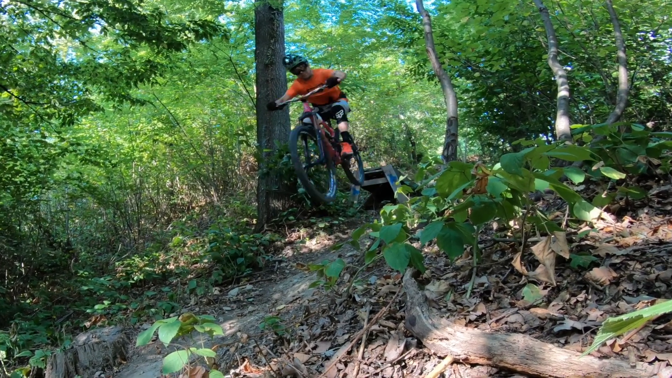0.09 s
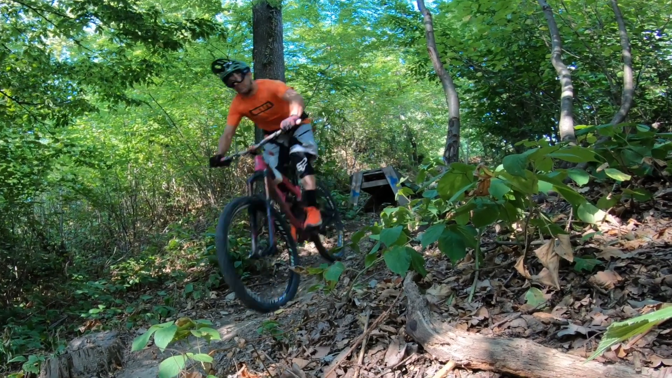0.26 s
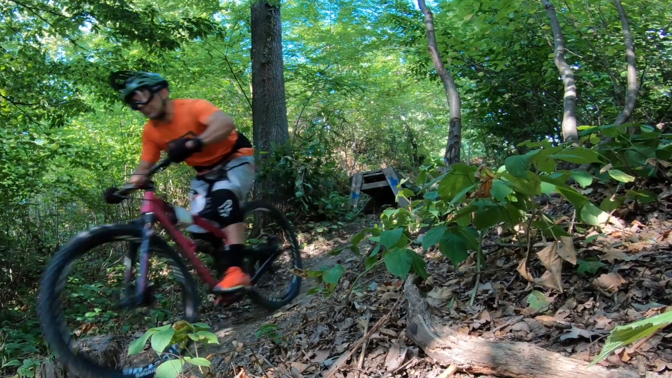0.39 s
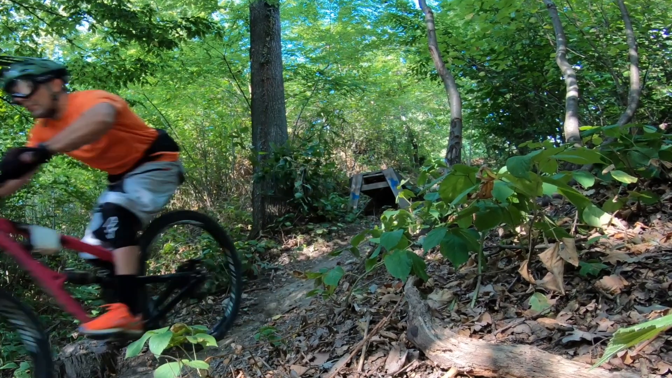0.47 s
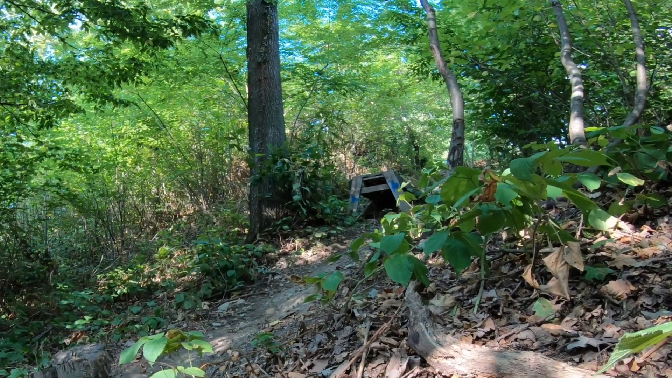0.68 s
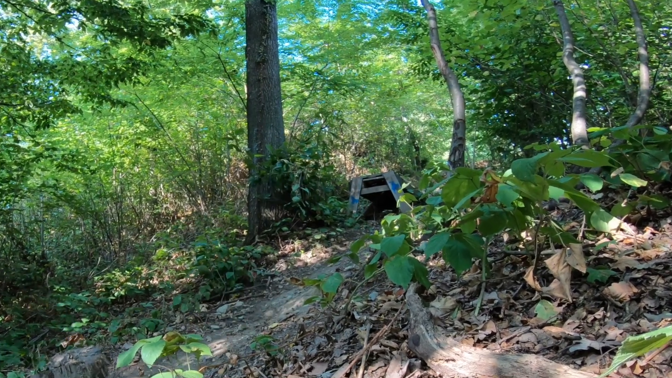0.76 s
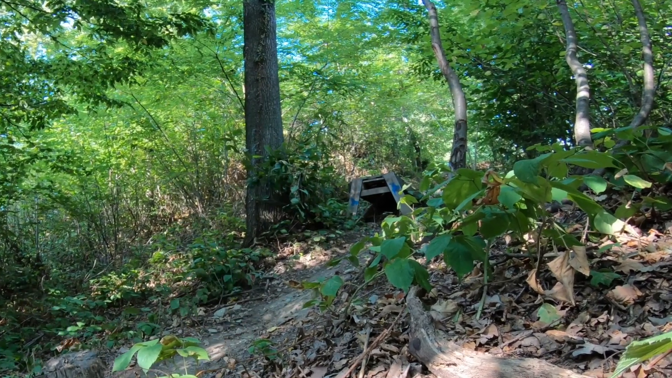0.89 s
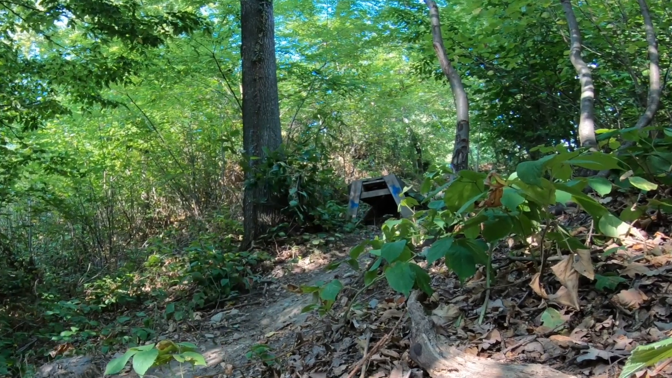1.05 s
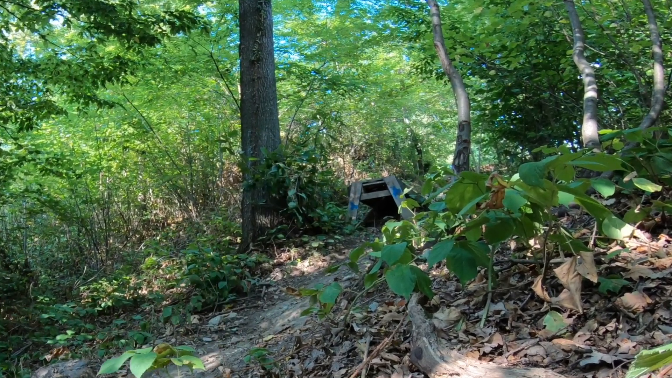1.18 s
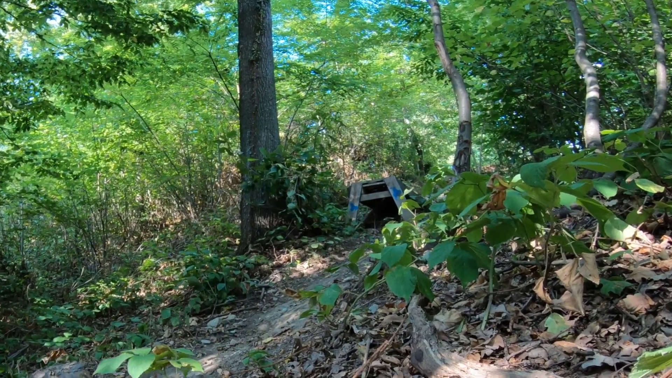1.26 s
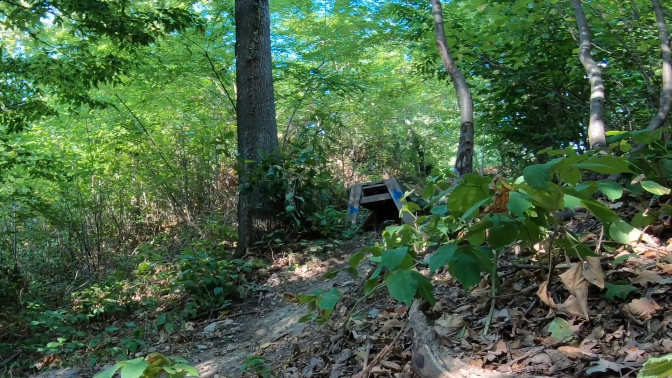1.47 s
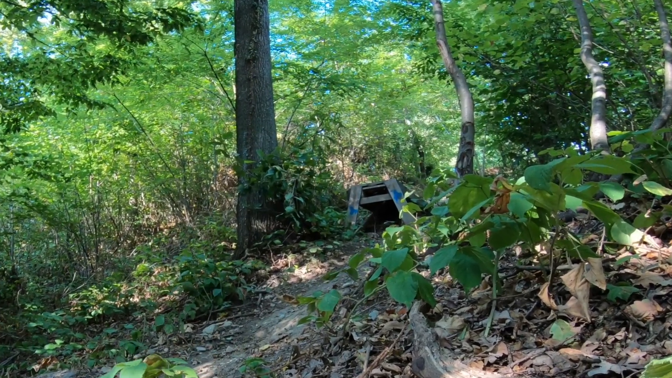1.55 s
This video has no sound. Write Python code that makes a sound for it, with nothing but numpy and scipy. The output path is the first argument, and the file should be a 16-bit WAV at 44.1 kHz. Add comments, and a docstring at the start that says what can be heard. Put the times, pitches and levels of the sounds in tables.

```python
"""A mountain bike lands on a leafy dirt trail close by and rolls away to the left in a faintly hissing wood.
Wheel thumps, knocks and chain clinks are decaying sine waves, the knocks and clinks with a contact sound.
Tyres ring as filtered noise and drone as gliding tones; discs and spokes sing as unsteady gliding tones.
Rattle, crunch, twigs and leaves are swarms of tiny random clicks, filtered; rumble and hiss are noise."""
import sys
import numpy as np
from scipy import signal
from scipy.fft import rfft, irfft
from scipy.io import wavfile
from scipy.ndimage import uniform_filter1d, map_coordinates

SR = 44100
rng = np.random.default_rng(int(sys.argv[2]) if len(sys.argv) > 2 else 0)


def bounce(signal):
    """Save signal as a 16-bit WAV file at the path given by the first command-line argument."""
    frames = np.transpose(np.atleast_2d(signal))
    limited = np.clip(frames, -1, 1)
    pcm = np.round(limited * 32767).astype(np.int16)
    wavfile.write(sys.argv[1], SR, pcm)


N = 72765  # length in samples

# Where the bike is between left and right: t/s, left minus right/dB
BIKE_PAN = [(0, -2), (.25, -2), (.45, 0), (.56, .5), (.65, 4.5), (.76, 7.5), (1.0, 7), (1.3, 8.5),
            (1.65, 8)]
# Clicks in leaves, grit and twigs: how many per second, and how unequal their strengths are in dB
LITTER_PER_S, LITTER_SPREAD_DB = 4500, 2.7


def undb(db):
    """Turn decibels into an amplitude factor."""
    return 10 ** (np.asarray(db) / 20)


def unit(x):
    """Scale to rms 1."""
    return x / np.sqrt(np.mean(x ** 2))


def times():
    """The time of every sample in seconds."""
    return np.arange(N) / SR


def curve(rows, axis=1):
    """One column of a table, joined by straight lines in time."""
    rows = np.array(rows)
    return np.interp(times(), rows[:, 0], rows[:, axis])


def colour(x, points):
    """Filter through (f/Hz, level/dB) points without pre-echo, keeping the power of white noise."""
    size = 8192
    hz, db = np.array(points).T
    bins_hz = np.maximum(np.fft.rfftfreq(size, 1 / SR), 1)
    gain = undb(np.interp(np.log(bins_hz), np.log(hz), db))
    # folding the cepstrum makes the filter respond as early as it can (minimum phase)
    cepstrum = irfft(np.log(gain))
    cepstrum[1:size // 2] *= 2
    cepstrum[size // 2 + 1:] = 0
    response = irfft(np.exp(rfft(cepstrum)))
    return signal.fftconvolve(x, response / np.linalg.norm(response))[:len(x)]


def below(x, hz):
    """The part of a sound under a frequency, with no delay."""
    low_pass = signal.butter(3, min(hz, SR / 3), fs=SR, output="sos")
    return signal.sosfiltfilt(low_pass, x)


def resonance(x, hz, width):
    """A resonance applied twice, for steep skirts; rms 1. The width in Hz is that of one pass."""
    b, a = signal.iirpeak(hz, hz / width, fs=SR)
    once = signal.lfilter(b, a, x)
    return unit(signal.lfilter(b, a, once))


def grains(per_s, spread_db):
    """Random tiny impacts, a few far stronger than the rest; rms 1."""
    size = undb(spread_db * np.minimum(rng.exponential(size=N), 5))
    hits = rng.random(N) < per_s / SR
    return unit(hits * size * rng.choice([-1, 1], N))


def burst(x, env):
    """Shape a sound by an envelope, keeping the envelope's energy."""
    shaped = x * env
    return shaped * np.linalg.norm(env) / (np.linalg.norm(shaped) + 1e-12)


def fade(age, t60):
    """Exponential decay that falls by 60 dB in t60 seconds."""
    return np.exp(-np.log(1000) * age / t60)


def ring(start, hz, t60):
    """One struck mode: a sine wave that dies away."""
    age = np.maximum(times() - start, 0)
    return np.sin(2 * np.pi * hz * age) * fade(age, t60)


def peak(x, db):
    """Scale a sound so that its highest peak has this level."""
    return x * undb(db) / (np.abs(x).max() + 1e-12)


def bell(middle, half):
    """A smooth rise and fall around a moment."""
    return np.exp(-.5 * ((times() - middle) / half) ** 2)


def walk(per_s):
    """Slow chance: random points, so many per second, joined by lines; spread near 1."""
    return np.interp(times() * per_s, np.arange(1000), rng.standard_normal(1000))


def waver(x, share, per_s):
    """Let the pitch of a sound wander by a share of itself."""
    drift = walk(per_s)
    read_at = np.cumsum(1 + share * (drift - drift.mean()))
    return map_coordinates(x, [read_at], mode="mirror")


def wood():
    """Faint air and the high hiss of insects and foliage: filtered noise, separate left and right."""
    # Tone of the air: f/Hz, level/dB
    air_tone = [(20, -16), (40, -2), (80, -9), (150, 0), (230, 0), (340, -19), (700, -19), (1500, -11),
                (2300, -3), (4800, -9), (6800, -1), (9000, -7), (13000, -21), (15000, -31)]
    # Loudness of the distant hiss: t/s, level/dB
    hiss_level = [(0, -64), (.6, -56), (1.1, -52), (1.45, -53), (1.57, -48.5), (1.65, -50)]
    # Tone of the hiss: f/Hz, level/dB
    hiss_tone = [(1000, -35), (3000, -8), (5000, -5), (7200, 0), (10000, -5), (11500, -17), (15000, -32)]
    air = np.array([colour(rng.standard_normal(N), air_tone) for _ in range(2)])
    hiss = np.array([colour(rng.standard_normal(N), hiss_tone) for _ in range(2)])
    return undb(-54.5) * air + undb(curve(hiss_level)) * hiss


def leaves():
    """Dry leaves and grit are thrown up and settle, other bits to the left than to the right."""
    # Sprays of dry leaves and grit: t/s, level/dB, decay/s
    spray_table = [(.222, -35, .05), (.256, -27, .018), (.287, -24, .012), (.41, -34, .012),
                   (.452, -30.5, .025), (.472, -29, .01), (.496, -25.5, .007), (.62, -37, .025),
                   (.749, -35, .035), (.846, -37, .045), (.959, -31.5, .06)]
    # Fine grit under the tread: t/s, level/dB
    grit_level = [(0, -64), (.15, -57), (.21, -59), (.23, -41), (.33, -36.5), (.39, -40), (.48, -39),
                  (.53, -45), (.58, -44), (.70, -50), (.8, -48), (1.05, -48), (1.2, -53), (1.32, -49),
                  (1.45, -53), (1.65, -52)]
    # Tone of leaves and grit: f/Hz, level/dB
    litter_tone = [(400, -30), (2000, -7), (3500, -2), (5000, 0), (7200, 0), (8300, -5), (9800, -8),
                   (11500, -19), (13500, -24), (15000, -40)]
    attack_s = .002
    t = times()
    power = undb(curve(grit_level)) ** 2
    for start, db, decay in spray_table:
        attack = np.clip((t - start) / attack_s, 0, 1)
        power += (undb(db) * attack * np.exp(-np.abs(t - start) / decay)) ** 2
    env = np.sqrt(power)
    pan = -2 + curve(BIKE_PAN) / 2  # left minus right in dB: follows the bike by half
    ears = []
    for side in (1, -1):
        litter = colour(grains(LITTER_PER_S, LITTER_SPREAD_DB) * env, litter_tone)
        ears.append(litter * undb(side * pan / 2))
    return np.array(ears)


def twigs():
    """Twigs and dry stalks crack under the tyres: a few clicks of breaking fibre that die at once."""
    # Snaps: t/s, peak/dB, top of the crack f/Hz
    snap_table = [(.2615, -18, 7000), (.2875, -19, 8000), (.2945, -17, 7000), (.452, -17, 5000),
                  (.459, -16, 6000), (.4732, -15, 6500), (.6205, -18, 6000), (.7492, -17.5, 14000),
                  (.8448, -15, 14000), (.958, -14, 14000), (1.0815, -27, 9000), (1.162, -30, 6000),
                  (1.322, -27, 5000), (1.3735, -29, 5000)]
    # Tone of a snap: f/Hz, level/dB
    snap_tone = [(300, -35), (1800, -12), (2600, 0), (3700, -1), (5200, -7), (9500, -7), (12000, -21),
                 (15000, -42)]
    decay_s = .002
    t, fibres = times(), grains(LITTER_PER_S, LITTER_SPREAD_DB)
    out = np.zeros(N)
    for start, db, top_hz in snap_table:
        cracking = fibres * (t > start) * np.exp(-np.abs(t - start) / decay_s)
        out += peak(below(colour(cracking, snap_tone), top_hz), db)
    return out


def zings():
    """Brake discs and spokes are rubbed into a short, unsteady ring, often sagging in pitch."""
    # Zings: middle t/s, half length/s, f/Hz at the middle, glide/(Hz per s), level/dB
    zing_table = [(.368, .018, 1980, -7000, -35), (.43, .018, 2900, -3000, -41),
                  (.603, .016, 2570, -7000, -35), (.645, .022, 2120, -4000, -38), (.99, .02, 1990, 0, -37),
                  (1.485, .02, 2900, -3000, -48), (1.56, .025, 2650, 0, -45),
                  (1.615, .018, 2720, -3000, -44)]
    rub_per_s = 180  # faster rubbing blurs the pitch more
    t = times()
    rub = walk(rub_per_s) + 1j * walk(rub_per_s)
    out = np.zeros(N)
    for middle, half, hz, glide, db in zing_table:
        phase = 2 * np.pi * np.cumsum(hz + glide * (t - middle)) / SR
        tone = np.real(rub * np.exp(1j * phase))
        out += undb(db) * burst(tone, bell(middle, half))
    return out


def clinks():
    """Chain links scrape into contact with metal and give a short, dry ring."""
    # Clinks: t/s, peak/dB, f/Hz, time to fall 60 dB/s
    clink_table = [(.2260, -13, 2950, .007), (.4105, -10, 2930, .011), (.4995, -14, 2780, .013),
                   (1.4612, -24, 2900, .012), (1.5138, -27.5, 2680, .025), (1.552, -30, 2650, .015),
                   (1.6025, -29, 2750, .014), (1.624, -29, 2620, .014)]
    # Modes of the metal: pitch ratio to the clink, level/dB
    metal_modes = [(.55, -13), (.8, -14), (.94, -7), (1, 0), (1.09, -10), (2.05, -16)]
    contact_s, scrape_db = .0015, -9
    out, t = np.zeros(N), times()
    chances = rng.standard_normal((len(clink_table), len(metal_modes)))
    for (start, db, hz, t60), chance in zip(clink_table, chances):
        metal = np.zeros(N)
        for (ratio, mode_db), c in zip(metal_modes, chance):
            metal += undb(mode_db) * ring(start, hz * ratio * (1 + .015 * c), t60)
        scrape = resonance(rng.standard_normal(N), hz, hz / 2) * fade(np.abs(t - start), t60)
        contact = np.clip((t - start) / contact_s, 0, 1)
        out += peak((metal + undb(scrape_db) * scrape) * contact, db)
    return out


def knocks():
    """A sharp one-cycle contact, then the frame rings, most in the modes near the contact's pitch."""
    # Stones and chain hitting the frame: t/s, contact peak/dB, contact f/Hz, frame ring peak/dB
    knock_table = [(.2133, -22, 1900, -28), (.4648, -10, 1500, -22), (.5545, -15, 1100, -11),
                   (.5567, -11, 1400, -14), (.5625, -16, 2200, -11.5), (.5654, -10, 2800, -22),
                   (.6203, -18, 2300, -27), (.6318, -14, 1700, -23), (.6678, -19, 2100, -28),
                   (.768, -22, 1400, -26), (.789, -25, 1100, -30), (.863, -24, 900, -27),
                   (.878, -25, 1300, -29), (1.0303, -17.5, 1100, -21), (1.1975, -27, 1900, -33),
                   (1.2330, -24, 1100, -35), (1.2958, -21, 800, -29), (1.3053, -16, 1300, -26),
                   (1.3122, -21, 550, -30)]
    # Modes of the frame: f/Hz, level/dB, time to fall 60 dB/s
    frame_modes = [(680, -8, .025), (950, -6, .025), (1200, -7, .025), (1375, 0, .03), (1600, -5, .025),
                   (2140, 0, .03), (3100, -8, .02)]
    out, t = np.zeros(N), times()
    chances = rng.standard_normal((len(knock_table), len(frame_modes)))
    for (start, db, hz, ring_db), chance in zip(knock_table, chances):
        squeeze = (np.pi * hz * (t - start)) ** 2
        contact = (2 * squeeze - 1) * np.exp(-squeeze)
        frame = np.zeros(N)
        for (mode_hz, mode_db, t60), c in zip(frame_modes, chance):
            closeness = (mode_hz / hz) ** 2 * np.exp(-(mode_hz / hz) ** 2)
            frame += undb(mode_db) * closeness * ring(start, mode_hz * (1 + .015 * c), t60)
        out += peak(contact, db) + peak(frame, ring_db)
    return out


def rattles():
    """Each bump shakes a swarm of clicks out of chain and frame."""
    # Bursts of rattle: middle t/s, half length/s, level/dB, treble against body/dB
    rattle_table = [(.155, .028, -50.5, 22), (.220, .005, -26, 6), (.318, .008, -34, 8),
                    (.4545, .003, -27, 10), (.461, .003, -28, 10), (.475, .004, -25.5, 10),
                    (.5585, .009, -14.5, 7), (.627, .0075, -19, 1.5), (.667, .004, -29, 3),
                    (.680, .004, -28, -4), (.714, .005, -33, -3), (.755, .006, -31, -2),
                    (.769, .005, -26, 2), (.791, .005, -30, -4), (.870, .009, -27, -1),
                    (1.085, .005, -35, 2), (1.166, .005, -34, 8), (1.238, .005, -36, -4),
                    (1.315, .008, -33.5, -7), (1.338, .007, -40, -14), (1.362, .013, -32.5, -11),
                    (1.460, .012, -33.5, -7), (1.560, .008, -33.5, -6), (1.612, .007, -32.5, -5)]
    # Tone of the body of the rattle: f/Hz, level/dB
    body_tone = [(80, -22), (170, -3), (300, -1), (480, 0), (680, 1), (900, -1.5), (1350, -2), (2000, -13),
                 (4000, -31), (15000, -76)]
    # Tone of its treble: f/Hz, level/dB
    treble_tone = [(200, -30), (900, -12), (1380, 4), (1780, -3), (2150, 2.5), (2450, -7), (3000, -7),
                   (4100, -17), (7000, -21), (8500, -35), (15000, -70)]
    clicks = grains(per_s=4500, spread_db=1.8)
    body, treble = np.zeros(N), np.zeros(N)
    for middle, half, db, treble_db in rattle_table:
        env = 1 / (1 + ((times() - middle) / half) ** 4)
        # the division keeps body and treble together at the given level
        swarm = undb(db) * burst(clicks, env) / np.hypot(1, undb(treble_db))
        body += swarm
        treble += undb(treble_db) * swarm
    return colour(body, body_tone) + colour(treble, treble_tone)


def drones():
    """A tyre pressed into the ground drones briefly, its pitch wavering and often sliding with the load."""
    # Drones: middle t/s, half length/s, f/Hz at the middle, glide/(Hz per s), level/dB
    drone_table = [(.262, .02, 232, 0, -31.5), (.41, .025, 400, -150, -41), (.485, .02, 97, -200, -34),
                   (.51, .035, 236, -100, -35), (.59, .025, 400, -200, -34), (.605, .035, 129, -120, -34),
                   (.74, .05, 400, 0, -43), (.79, .025, 228, 200, -34), (.97, .035, 110, -350, -41),
                   (1.01, .03, 232, 0, -39), (1.275, .025, 228, -100, -35), (1.375, .02, 172, -300, -42),
                   (1.475, .018, 332, 0, -43)]
    out, t = np.zeros(N), times()
    flex = 1 + .025 * walk(per_s=40)
    for middle, half, hz, glide, db in drone_table:
        phase = 2 * np.pi * np.cumsum((hz + glide * (t - middle)) * flex) / SR
        out += undb(db) * np.sqrt(2) * np.sin(phase) * bell(middle, half)
    return out


def even(x):
    """Smooth out the loudness over about a twelfth of a second, to rms near 1."""
    return x / np.sqrt(uniform_filter1d(x ** 2, SR // 12) + 1e-12)


def rolling():
    """Rough ground rumbles, rings the tyres and crunches under the tread."""
    # Loudness while rolling: t/s, ground rumble/dB, tyre ring/dB, crunch/dB
    roll_level = [(0, -76, -69, -68), (.15, -72, -65, -60), (.208, -60, -60, -58), (.222, -32, -33, -34),
                  (.30, -34, -31.5, -31.5), (.34, -40, -34, -33), (.44, -40, -37, -33),
                  (.53, -35, -37, -35), (.58, -37, -35, -32.5), (.612, -37, -38, -37),
                  (.66, -37, -40, -35.5), (.70, -30, -43, -40.5), (.79, -29, -36, -38.5),
                  (.835, -46, -41, -44), (.89, -34, -36, -41), (.94, -43, -41, -44), (1.01, -40, -41, -38),
                  (1.14, -45, -46, -46), (1.21, -46, -44, -48), (1.27, -45, -40, -48),
                  (1.33, -47, -39, -41), (1.40, -46, -40, -44.5), (1.52, -55, -49, -48),
                  (1.65, -61, -44, -43.5)]
    # Tone of the rumble: f/Hz, level/dB
    rumble_tone = [(12, -40), (22, -16), (32, -3), (46, 0), (70, -5), (125, -6), (170, -15), (300, -25),
                   (800, -50), (3000, -80)]
    # Modes of the tyres: f/Hz, width/Hz, level/dB
    tyre_modes = [(100, 45, -8), (130, 45, -5), (175, 70, -7), (233, 26, -1), (290, 120, -8),
                  (402, 34, -11), (490, 160, -9)]
    # Tone of the crunch: f/Hz, level/dB
    crunch_tone = [(60, -22), (200, -5), (450, -2), (680, 1), (900, 1), (1150, -2), (1450, -.5), (2100, .5),
                   (2900, 0), (3900, -7.5), (5200, -15), (7300, -17), (10000, -26), (15000, -54)]
    # each mode wanders in pitch (share) and level (dB) as the tyre flexes
    drift, swell_db, flex_per_s = .035, 3, 16
    flutter_db, flutter_per_s = 2.0, 65

    rumble = even(colour(rng.standard_normal(N), rumble_tone))
    push = rng.standard_normal(N)
    tyre = np.zeros(N)
    for hz, width, db in tyre_modes:
        swell = undb(db + swell_db * walk(flex_per_s))
        tyre += swell * waver(resonance(push, hz, width), drift, flex_per_s)
    tyre = below(even(tyre), hz=700)
    flutter = undb(flutter_db * walk(flutter_per_s))
    crunch = colour(grains(per_s=4000, spread_db=3.2) * flutter, crunch_tone)
    return (rumble * undb(curve(roll_level, axis=1))
            + tyre * undb(curve(roll_level, axis=2))
            + crunch * undb(curve(roll_level, axis=3)))


def thumps():
    """The wheels strike the ground and boom briefly."""
    # Hits of the wheels: t/s, f/Hz, level/dB, time to fall 60 dB/s
    thump_table = [(.2195, 46, -13.5, .2), (.263, 50, -22, .1), (.280, 54, -21, .1), (.302, 232, -21, .11),
                   (.530, 390, -20, .06), (.556, 465, -23, .06), (.884, 52, -25, .1),
                   (1.557, 260, -28, .04)]
    return sum(undb(db) * ring(start, hz, t60) for start, hz, db, t60 in thump_table)


def echoes(x, t60, start):
    """Diffuse reflections as a fading tail of noise, different left and right."""
    t = times()
    tail = rng.standard_normal((2, N)) * (t >= start) * fade(t, t60)
    tail /= np.linalg.norm(tail, axis=1, keepdims=True)
    return signal.fftconvolve(x[None], tail, axes=1)[:, :N]


def place(bike):
    """Bass stays near the centre, the middle moves left, treble scatters off leaf litter; trees echo faintly."""
    bass_edge_hz, treble_edge_hz = 480, 4300
    bass_pan_db, treble_pan_db = -.8, -1.5  # left minus right
    lag_s_per_db = 6e-6  # the nearer ear hears the sound earlier
    scatter_db, scatter_s = -3, .006
    trees_db, bass_echo_db, trees_t60_s = -15, -20, .35
    t, pan, sides = times(), curve(BIKE_PAN), np.array([[1], [-1]])

    bass = below(bike, bass_edge_hz)
    upper = bike - bass
    ears = []
    for side in (1, -1):
        read_at = (t + side * pan * lag_s_per_db / 2) * SR
        ears.append(map_coordinates(upper, [read_at], mode="nearest"))
    ears = np.array(ears)
    middle = below(ears, treble_edge_hz)
    scatter = echoes(bike - below(bike, treble_edge_hz), scatter_s, start=0)
    treble = (ears - middle + undb(scatter_db) * scatter) / np.hypot(1, undb(scatter_db))

    direct = (bass * undb(sides * bass_pan_db / 2)
              + middle * undb(sides * pan / 2)
              + treble * undb(sides * treble_pan_db / 2))
    slope = undb(bass_echo_db) * echoes(bass, trees_t60_s, start=.012)  # low end returning from the slope
    trees = undb(trees_db) * echoes(upper, trees_t60_s, start=.012)
    return direct + slope + trees


def scene():
    """The bike, placed left and right, over leaves and wood."""
    wheels = thumps() + drones() + rolling()
    metal = rattles() + knocks() + clinks() + zings()
    return place(wheels + metal + twigs()) + leaves() + wood()


def record(dry):
    """The recorder cuts the top steeply above 15500 Hz."""
    low_pass = signal.ellip(8, .2, 70, 15500, fs=SR, output="sos")
    return signal.sosfilt(low_pass, dry)


dry = scene()
out = record(dry)
bounce(out)
```